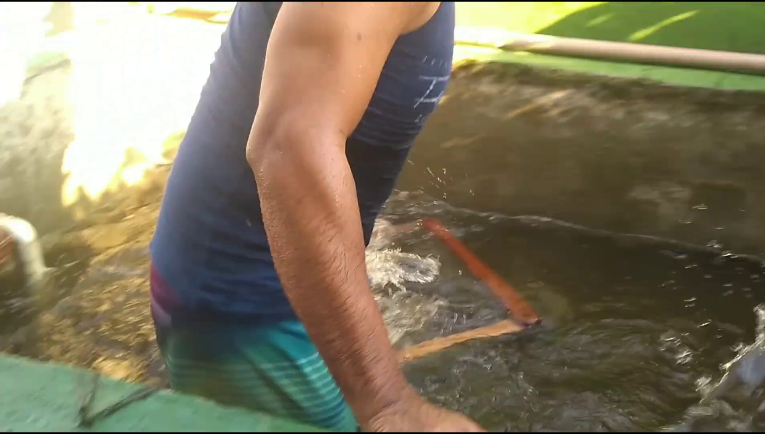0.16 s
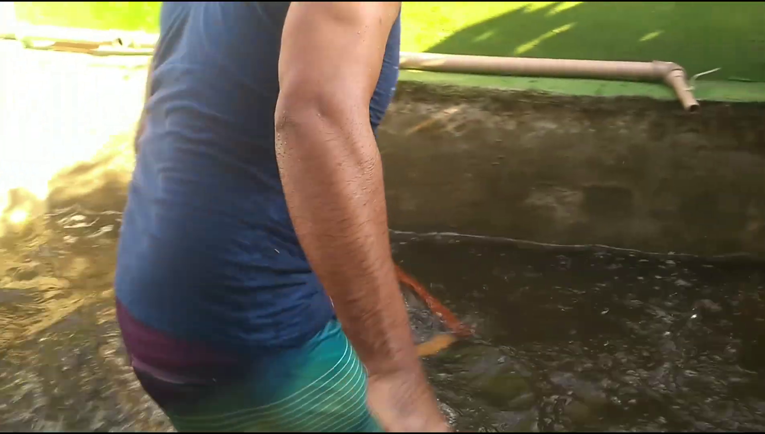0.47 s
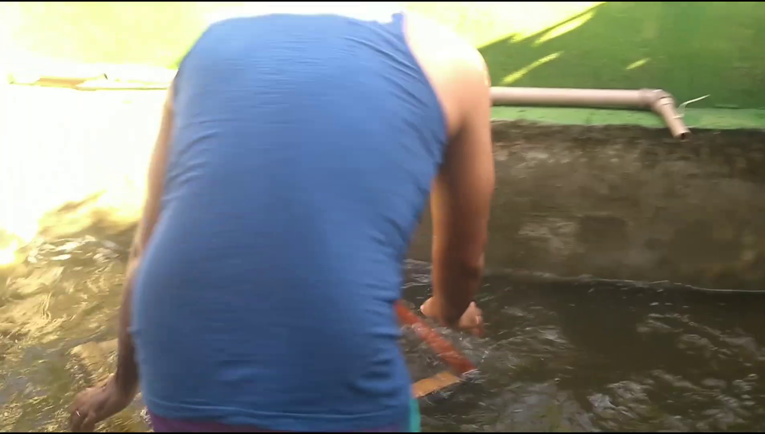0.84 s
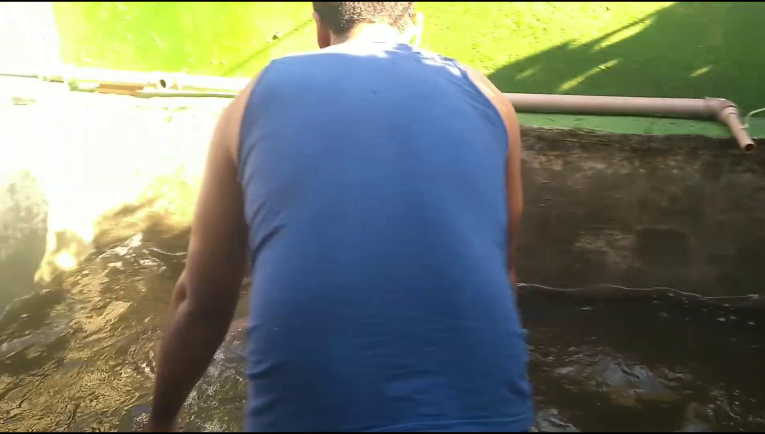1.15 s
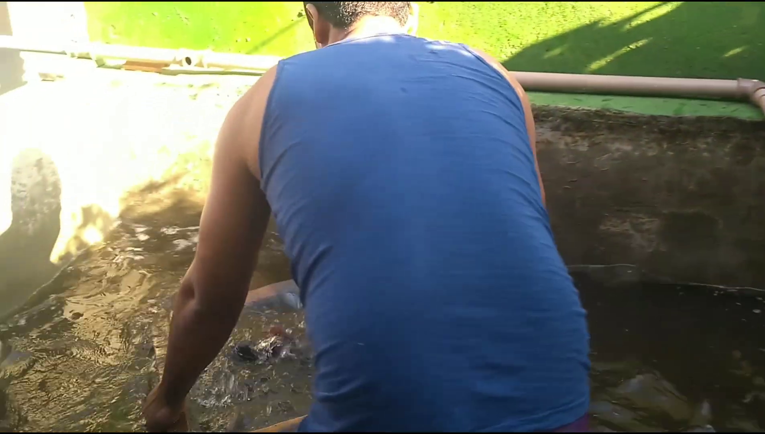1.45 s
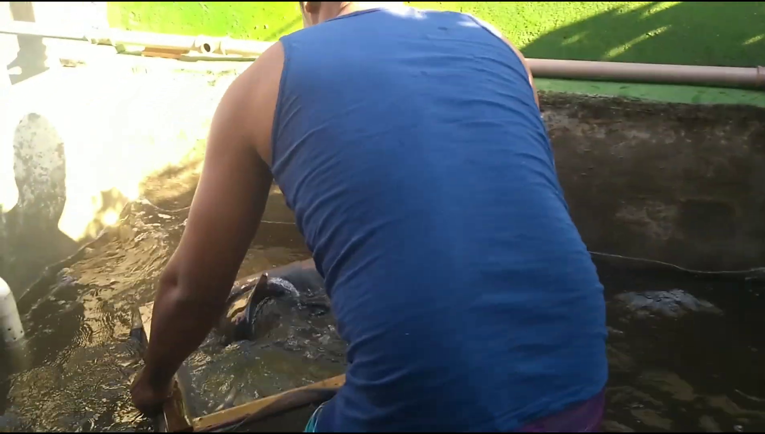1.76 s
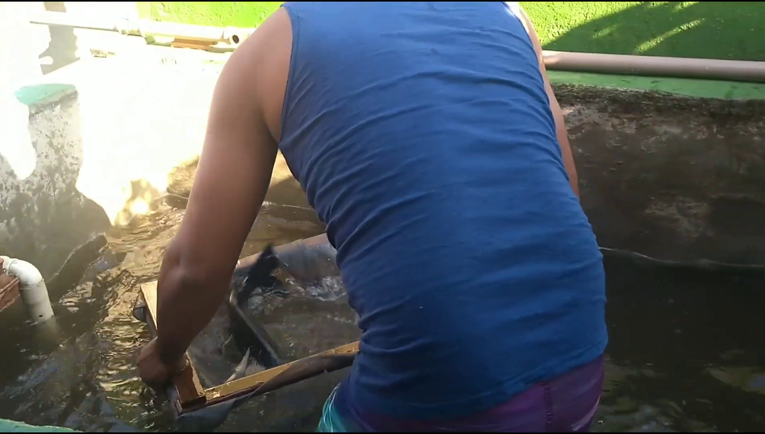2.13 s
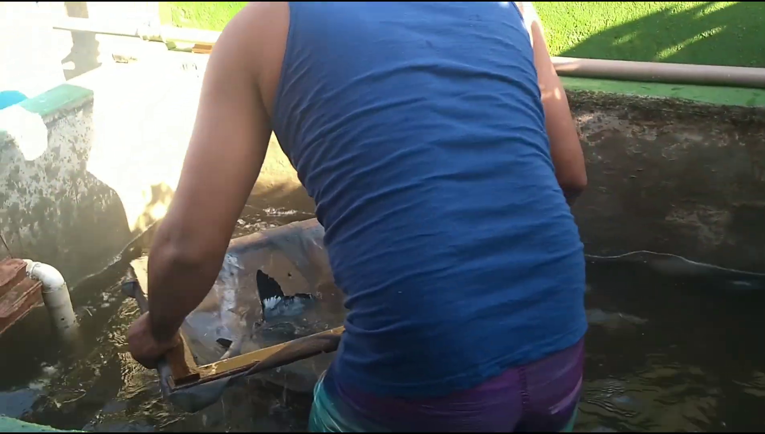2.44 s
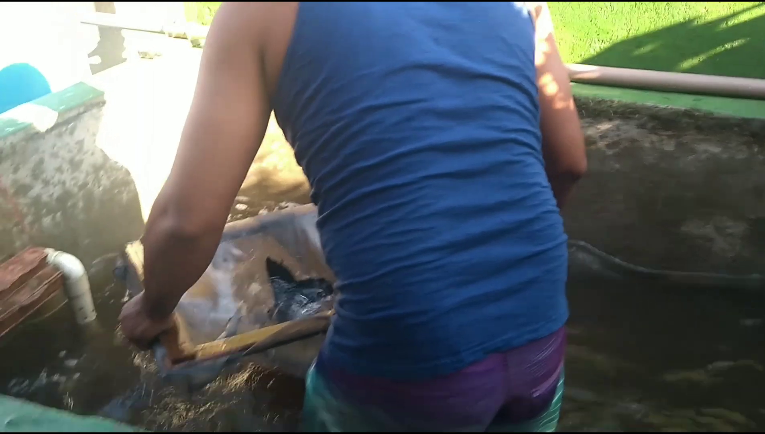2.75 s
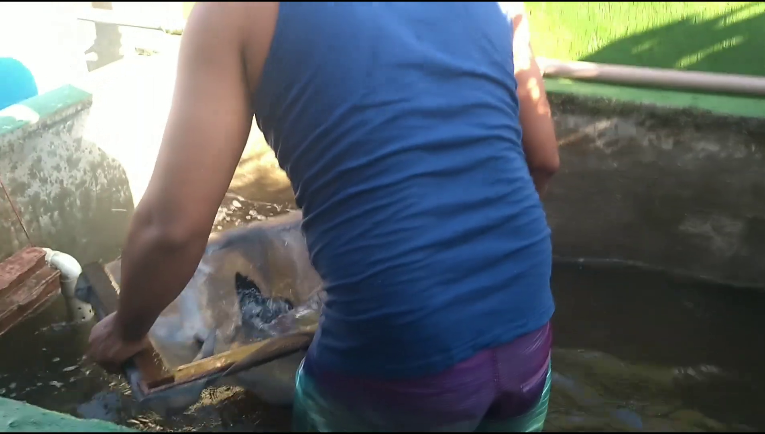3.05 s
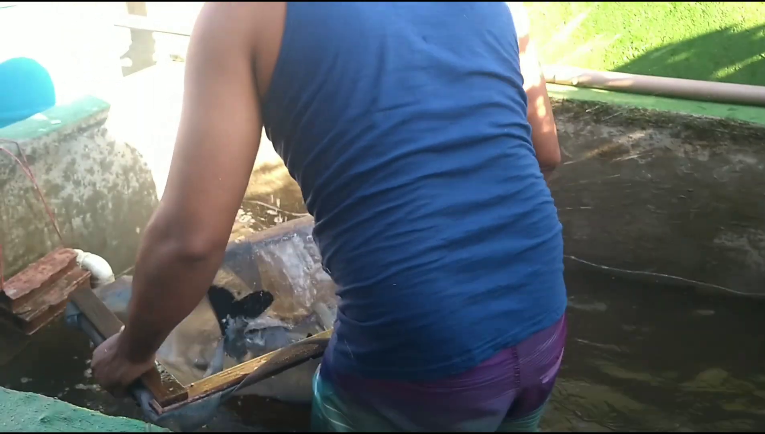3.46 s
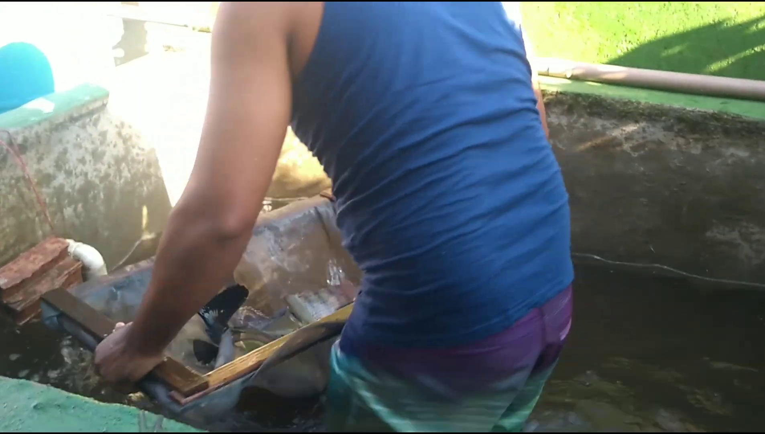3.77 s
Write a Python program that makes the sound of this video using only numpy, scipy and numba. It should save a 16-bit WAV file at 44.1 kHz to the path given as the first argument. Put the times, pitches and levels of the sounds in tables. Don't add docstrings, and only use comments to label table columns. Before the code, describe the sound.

Splashing, bubbling water churned by a net in an outdoor tank, loudest first, then surging again

```python
import sys
import numpy as np
from scipy import signal
from scipy.fft import rfft, irfft, next_fast_len
from scipy.io import wavfile
from scipy.ndimage import uniform_filter1d
from numba import njit

SR = 44100
rng = np.random.default_rng(int(sys.argv[2]) if len(sys.argv) > 2 else 0)


def boost_factor(decibels):
    exponent = np.asarray(decibels, float) / 20
    return 10 ** exponent


def digitize_waveform(pressure):
    field = np.atleast_2d(pressure).T
    bounded = np.clip(field, -1, 1)
    quanta = np.round(bounded * 32767).astype(np.int16)
    wavfile.write(sys.argv[1], SR, quanta)


N = 171990


def table(points, hz):
    p = np.array(points, float)
    return np.interp(np.log(np.maximum(hz, 1)), np.log(p[:, 0]), p[:, 1])


def unit(x):
    return x / np.sqrt(np.mean(x[0] ** 2))


# frequency in Hz, side level against mid in dB.
SIDE_SPREAD = [(1500, -57), (3000, -52), (4500, -8.5), (8000, -7), (14000, -13)]


def mid_side_gain(hz):
    return np.array([np.ones(len(hz)), boost_factor(table(SIDE_SPREAD, hz))])


def hiss(points):
    hz = np.arange(N // 2 + 1) * SR / N
    gain = boost_factor(table(points, hz)) * mid_side_gain(hz)
    return unit(irfft(rfft(rng.standard_normal((2, N))) * gain, N))


def walk(rate):
    k = int(SR / rate)
    steps = np.repeat(rng.standard_normal(400), k)[:N]
    return 0.86 * uniform_filter1d(uniform_filter1d(steps, k), k)


@njit
def ring(n, start, step, decay, rise, glide, size, side):
    out = np.zeros((2, n))
    for k in range(len(start)):
        fall, swell = size[k], size[k]
        phase, turn = 0., step[k]
        for i in range(start[k], n):
            level = fall - swell
            out[0, i] += level * np.sin(phase)
            out[1, i] += level * (np.cos(phase) + .5 * np.sin(phase)) * side[k]
            fall *= decay[k]
            swell *= rise[k]
            phase += turn
            turn = min(turn * glide[k], 2.8)
            if fall < size[k] * .003:
                break
    return out


def grains(s, hz, t60, db, rise, glide, place):
    n = np.maximum(t60 * SR, 4)
    decay = np.exp(-np.log(1000) / n)
    swell = decay ** (1 + 1 / max(rise, .01))
    side = boost_factor(table(SIDE_SPREAD, hz)) * place
    return ring(N, (s * SR).astype(np.int64), 2 * np.pi * hz / SR, decay, swell,
                (1 + glide) ** (1 / n), boost_factor(db), side)


# frequency in Hz, level in dB.
WATER_COLOUR = [(150, -27.5), (290, -9.5), (750, -4), (2000, -4.5), (3600, -11), (5400, -18), (8000, -16.5),
                (14000, -30.5)]


def swarm(count, lo_hz, hi_hz, cycles, scatter_db, clump_s, low_db=0):
    detune, glide = 0.146, 0.34
    clump_when, clump_pitch, clump_level = np.repeat(rng.random((count, 3)), 6, axis=0).T
    delay, level, length = rng.random((6 * count, 3)).T
    pitch, place = rng.standard_normal((6 * count, 2)).T
    s = np.minimum(clump_when * N / SR - clump_s * np.log(1 - delay), (N - 1) / SR)
    hz = lo_hz * (hi_hz / lo_hz) ** clump_pitch * (1 + detune) ** pitch
    hz = np.minimum(hz, .35 * SR)
    big = (low_db + np.zeros(N))[(s * SR).astype(int)] * (1 - 2 * clump_pitch)
    scatter = -scatter_db * np.log((1 - .9 * clump_level) * (1 - .9 * level))
    db = table(WATER_COLOUR, hz) + 10 * np.log10(hz) + scatter + big
    t60 = cycles * (0.35 + 1.26 * length) / hz
    return unit(grains(s, hz, t60, db, 0.3, glide, place))


# start in seconds, peak in dB, brightness in dB, decay t60 in seconds.
NET_SLAPS = [(0.165, -4.5, -17, 0.096), (0.252, -6.5, -8, 0.27), (0.312, -7.5, 7.5, 0.48),
             (0.394, -6.5, -3.5, 0.84), (0.697, -23, 12, 1), (1.203, -20, 5, 0.22), (1.244, -20, -11, 0.27),
             (1.314, -19, 7, 0.32), (1.509, -24.5, 22, 0.91), (1.549, -20, 20, 0.18),
             (1.76, -18, 14.5, 0.15), (0.919, -19, 1, 0.073), (1.96, -12, 8, 0.1), (2.155, -22, 18, 0.23),
             (3.451, -14, -14.5, 0.4), (2.031, -14, -16, 1), (2.175, -12.5, 0.5, 0.78),
             (2.345, -17, 26, 0.16), (2.403, -16, 16, 0.47), (2.56, -29, 6, 0.22), (2.765, -14.5, 16, 0.31),
             (2.962, -9, 1, 0.98), (3.071, -3, 6.5, 0.14), (3.145, -11, 18.5, 0.27),
             (3.306, -38, -11.5, 0.23), (3.368, -12, -5, 0.67), (3.398, -16, -10, 0.83),
             (3.479, -5.5, 4, 0.1), (3.658, -17.5, 8.5, 0.29), (3.851, -21.5, 3, 0.53)]


def slaps():
    slap_db, rise_s = -13.5, 0.0011
    body, top = np.zeros((2, N))
    for s, db, bright_db, t60 in NET_SLAPS:
        u = np.maximum(np.arange(N) / SR - s, 0)
        burst = (boost_factor(db + slap_db - 60 * u / max(t60, .03)) * (1 - np.exp(-u / rise_s))) ** 2
        body += burst * boost_factor(-bright_db)
        top += burst * boost_factor(bright_db)
    return body, top


# start in seconds, level in dB, spray against it in dB, big-bubble share in dB.
NET_CHURN = [(0, -17, -12, 0.5), (.2, -18.5, -9, 9.5), (.45, -21.5, -10.5, 4.5), (.66, -24.5, -1, 10.5),
             (.8, -26, -3, -6), (.92, -34.5, -0.5, 2), (1.102, -35, -8.5, 2.5), (1.6, -31, -6, 3.5),
             (1.7, -35.5, -5, 10.5), (2.0, -32, -1, -2), (2.06, -30.5, -5.5, 1.5), (2.3, -29, -0.5, 3.5),
             (2.6, -29.5, 1, 9), (2.9, -22, -6.5, 0), (3.14, -25, -3, 8.5), (3.22, -32.5, -5, -3.5),
             (3.55, -34.5, 0, 6), (3.9, -36.5, -6, 15)]


def water():
    s, *columns = np.array(NET_CHURN, float).T
    level, bright, big = (np.interp(np.arange(N) / SR, s, c) for c in columns)
    slap_body, slap_top = slaps()
    body = boost_factor(level + 0.5 * walk(9.53)) ** 2 + slap_body
    top = boost_factor(level + bright + 1.3 * walk(10)) ** 2 + slap_top
    wash = boost_factor(-7 + 2.75 * walk(25.25)) * hiss(WATER_COLOUR)
    bubbles = boost_factor(-7.5) * swarm(count=700, lo_hz=251.4, hi_hz=2373, cycles=28.3, scatter_db=2.5,
                                clump_s=.025, low_db=big)
    fizz = boost_factor(-6 + 2.0 * walk(18)) * swarm(count=1100, lo_hz=1508, hi_hz=6590, cycles=17.5,
                                            scatter_db=3.5, clump_s=.012)
    spray_level = boost_factor(-10.5 + 2.3 * walk(7.3) + 6.2 * walk(35))
    spray = spray_level * swarm(count=5000, lo_hz=3094, hi_hz=15500, cycles=12.3,
                                scatter_db=2.0, clump_s=.008)
    return (wash + bubbles) * np.sqrt(body) + (fizz + spray) * np.sqrt(top)


# start in seconds, peak in dB, pitch in Hz.
SINGLE_BUBBLES = [(0.036, -10, 838), (0.175, -1.5, 785), (0.252, -0.5, 496.5), (0.393, -4.5, 1660),
                  (0.419, -3, 739.5), (0.449, -13, 809), (0.734, -13, 1795), (0.77, -2.5, 1412),
                  (0.085, -9, 1302), (0.96, -15, 1703), (1.011, -21.5, 1273), (0.225, -9.5, 1040),
                  (1.247, -15, 1650), (1.35, -19, 1724), (1.451, -19.5, 1350), (1.666, -15.5, 1157),
                  (1.69, -17, 918), (1.747, -20.5, 1210), (0.255, -10.5, 1125), (2.031, -13, 1150),
                  (2.05, -7, 933), (2.119, -10.5, 839), (0.31, -9, 499), (2.642, -9.5, 921),
                  (2.724, -8.5, 777), (2.847, -11.5, 942), (2.881, -5.5, 994), (2.962, -2.5, 1825),
                  (0.884, -18, 1140), (1.509, -20, 1800), (1.575, -23, 1930), (1.636, -19, 1007),
                  (1.88, -24, 1190), (2.08, -12, 1404), (2.21, -15, 540), (2.239, -12.5, 1620),
                  (2.498, -14, 1615), (2.642, -12, 1497), (2.868, -12, 1063), (3.075, -12, 803),
                  (3.155, -11, 1577), (3.368, -14, 1717), (3.465, -18.5, 900), (3.57, -22.5, 743),
                  (3.615, -21.5, 965), (3.795, -22, 1360), (3.888, -20, 1500)]


def single_bubbles():
    bubble_db, mates_db, mates_s = -5.5, -10, .02
    s, db, hz = np.array(SINGLE_BUBBLES, float).T
    t60 = 0.055 * (1000 / hz) ** .5
    db = db + bubble_db
    out = grains(s, hz, t60, db, 0.28, 0.14, rng.standard_normal(len(s)))
    for late, detune, place in rng.standard_normal((4, 3, len(s))):
        mate_s = s + mates_s * np.tanh(np.abs(late)) * np.minimum(1000 / hz, 1.5)
        out += grains(mate_s, hz * (1 + 0.0964 * detune), t60, db + mates_db, 0.18, 0.13, place)
    return out


# start in seconds, peak in dB, pitch in Hz, ring t60 in seconds.
HOLLOW_GULPS = [
    (1.478, -14.5, 114, 0.038),
    (2.724, -14.5, 279, 0.13),
    (3.402, -18, 175, 0.053),
    (0.51, -11.5, 420, 0.099),
    (0.63, -12, 440, 0.145),
    (3.404, -9, 445, 0.055),
    (2.775, -11, 292, 0.051),
    (2.04, -15.5, 440, 0.11),
    (3.31, -17.5, 1800, 0.062),
]


def gulps():
    s, db, hz, t60 = np.array(HOLLOW_GULPS, float).T
    return grains(s, hz, t60, db - 5.5, 0.15, 0.14, rng.standard_normal(len(s)))


# start in seconds, peak in dB, pitch in Hz.
SMALL_PINGS = [(0.7358, -25, 3060), (0.763, -15.5, 2970), (0.8057, -20, 3230), (0.8356, -12, 3480),
               (1.1192, -15, 2650), (1.511, -19, 3020), (1.763, -33, 3490), (1.9421, -15.5, 3330),
               (1.968, -22, 3500), (2.0315, -15, 3160), (2.167, -22, 3100), (2.18, -11, 2830),
               (2.3491, -28, 3260), (2.4045, -28, 2900), (2.4359, -19, 3260), (2.5205, -14.5, 2820),
               (2.622, -14.5, 3130), (2.7482, -15.5, 3100), (2.808, -18, 2970), (2.9423, -16, 3060),
               (2.9627, -10.5, 3450), (3.073, -7, 2690), (3.1513, -13, 2790), (3.3174, -25, 3380),
               (3.3987, -18, 2940), (3.485, -6, 3036), (3.656, -21, 3430), (3.8694, -24, 3030)]


def pings():
    s, db, hz = np.array(SMALL_PINGS, float).T
    return grains(s, hz, .025 * 3000 / hz, db - 4, 0.091, 0.093, rng.standard_normal(len(s)))


# start in seconds, peak in dB, pitch in Hz.
TICKING_DROPS = [(0.1677, -12, 5360), (0.317, -18, 5820), (0.386, -15, 5820), (0.553, -20, 7670),
                 (0.701, -16.5, 4910), (0.8056, -6.5, 5850), (0.9203, -30, 5100), (1.0051, -30, 7890),
                 (1.1179, -26, 5940), (1.1408, -26, 5920), (1.1593, -27, 7440), (1.1902, -30, 5600),
                 (1.3167, -24.5, 5720), (1.384, -29, 5250), (1.479, -23, 6100), (1.51, -21, 6140),
                 (1.5716, -20, 7750), (1.605, -21.5, 7700), (1.9026, -27, 7450), (1.9634, -25, 7560),
                 (2.0303, -30, 7320), (2.162, -19.5, 5900), (2.2867, -26, 5550), (2.3487, -9.5, 5700),
                 (2.4064, -22, 5600), (2.5591, -19, 5240), (2.7252, -18.5, 5510), (2.9637, -24, 5890),
                 (3.157, -15, 5560), (3.257, -26, 7900), (3.3232, -16.5, 7900), (3.3593, -22, 7860),
                 (3.4002, -12.5, 6300), (3.479, -32, 5270), (3.702, -23.5, 7760), (3.8555, -24.5, 5550)]


def drops():
    size = 4096
    width_octaves, drop_db, rise_s, t60_s = 0.63, 2, 0.0016, 0.012
    out = np.zeros((2, N + size))
    t, f = np.arange(size) / SR, np.arange(size // 2 + 1) * SR / size + 1
    for s, db, hz in TICKING_DROPS:
        peak = 1 / (1 + (np.log2(f / hz) / width_octaves) ** 2)
        colour = peak / (1 + (f / 9000) ** 2) * mid_side_gain(f)
        spatter = unit(irfft(rfft(rng.standard_normal((2, size))) * colour, size))
        envelope = boost_factor(db + drop_db - 60 * t / t60_s) * (1 - np.exp(-t / rise_s))
        start = int(s * SR)
        out[:, start:start + size] += spatter * envelope
    return out[:, :N]


def tank(dry):
    t60_s, tank_db = 0.18, -12
    t = np.arange(SR // 4) / SR
    tail = rng.standard_normal((2, len(t))) * boost_factor(-60 * t / t60_s) * (t > .003)
    tail = boost_factor(tank_db) * tail / np.sqrt(np.sum(tail ** 2, axis=1, keepdims=True))
    return dry + signal.fftconvolve(dry, tail, axes=1)[:, :N]


# start in seconds, firing rate in Hz, level in dB, line at that rate in dB.
FAR_ENGINE = [
    (0, 52, -64, 1),
    (.8, 56, -63, 10.5),
    (1.1, 59, -56, 0),
    (1.4, 60.7, -49.5, -7.5),
    (2.1, 62.4, -45.5, -6),
    (2.33, 64, -49.5, -8),
    (2.6, 66, -46.5, -4.5),
    (3.1, 67.7, -52, -3.5),
    (3.3, 68.5, -52.5, -12),
    (3.9, 70.3, -56.5, 3),
]


def engine():
    flutter_db = 6
    s, hz, db, low_db = np.array(FAR_ENGINE, float).T
    t = np.arange(N) / SR
    phase = 2 * np.pi * np.cumsum(np.interp(t, s, hz) * (1 + 0.009 * walk(6.47))) / SR
    low = boost_factor(np.interp(t, s, low_db) + flutter_db * walk(9)) * np.sin(phase)
    octave = boost_factor(flutter_db * walk(7)) * np.sin(2 * phase)
    return boost_factor(np.interp(t, s, db)) * (low + octave) * np.array([[1.4], [0]])


# frequency in Hz, level in dB.
AIR_COLOUR = [(25, -6), (60, -14), (120, 1.5), (250, 0), (1000, -9), (14000, -28.5)]


def air():
    return boost_factor(-44.5) * hiss(AIR_COLOUR)


def scene():
    dry = water() + single_bubbles() + gulps() + pings() + drops()
    mid, side = tank(dry) + engine() + air()
    return np.array([mid + side, mid - side])


def roll_off(x):
    return signal.sosfilt(signal.butter(12, 14330, fs=SR, output="sos"), x)


def record(dry):
    notch_hz, notch_db, notch_top_hz, port_skew = 2262, -1.5, 5560, .028
    bass_side_hz, bass_turn_hz, bass_side_db = 25.5, 620, 6
    size = next_fast_len(N + 4096)
    hz = np.arange(size // 2 + 1) * SR / size
    skew = port_skew * np.array([[-1], [1]]) / (1 + (3200 / (hz + 1)) ** 4)
    lag = (1 + skew) / notch_hz
    echo = boost_factor(notch_db) * np.exp(-2j * np.pi * hz * lag)
    echo = echo / np.sqrt(1 + (hz / notch_top_hz) ** 2) / (1 + (600 / (hz + 1)) ** 2)
    spec = rfft(dry, size) * (1 - echo) / (1 + (hz / 14330) ** 300)
    tilt = boost_factor(bass_side_db) * spec.mean(axis=0) * hz / (hz + 8)
    tilt = tilt / (1 + 1j * hz / bass_side_hz) / (1 + 1j * hz / bass_turn_hz)
    ports = irfft(spec + np.array([-tilt, tilt]), size)[:, :N]
    return roll_off(ports)


dry = scene()
out = record(dry)
digitize_waveform(out)
```